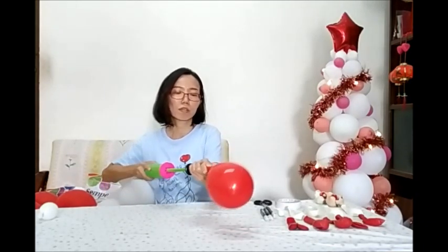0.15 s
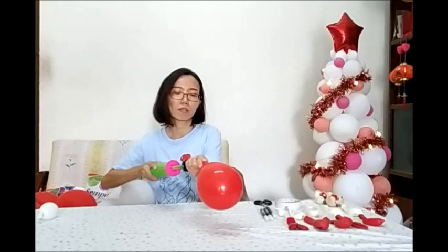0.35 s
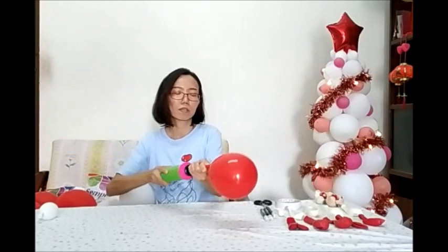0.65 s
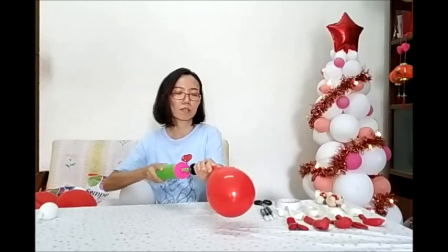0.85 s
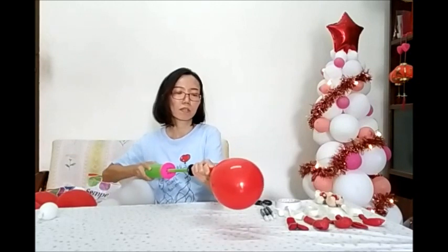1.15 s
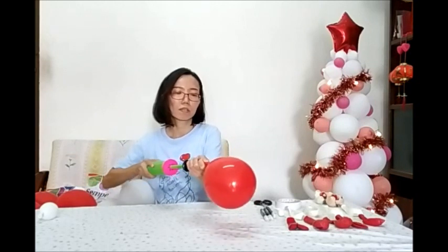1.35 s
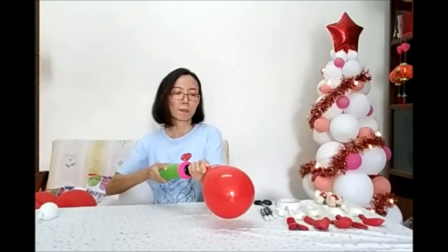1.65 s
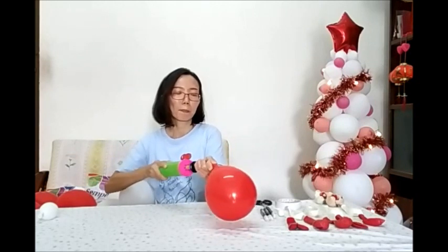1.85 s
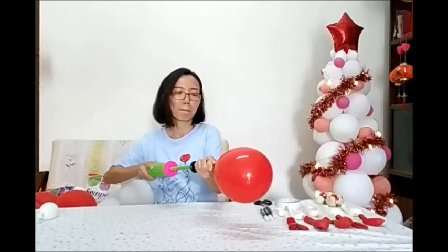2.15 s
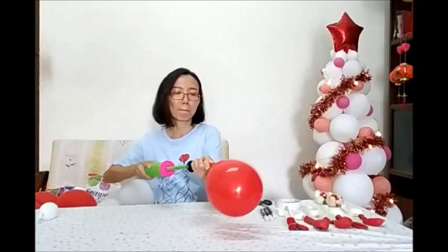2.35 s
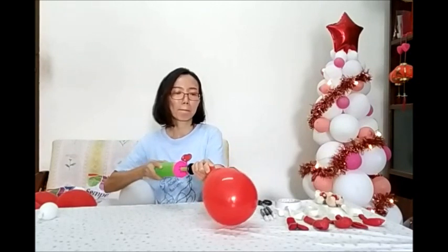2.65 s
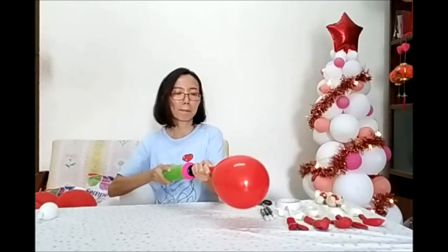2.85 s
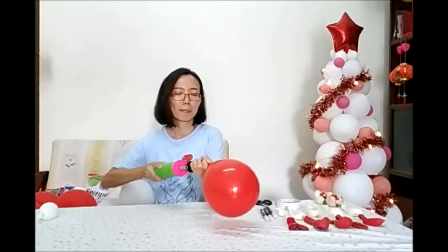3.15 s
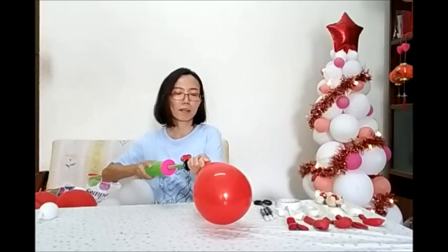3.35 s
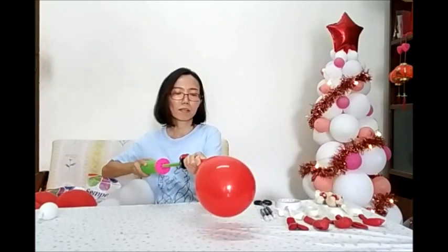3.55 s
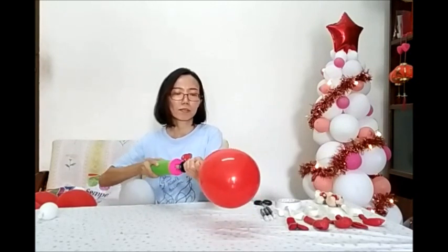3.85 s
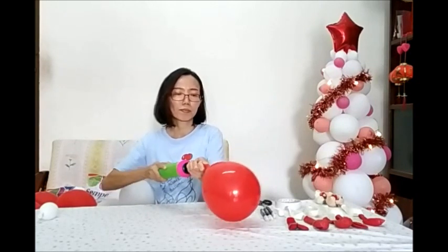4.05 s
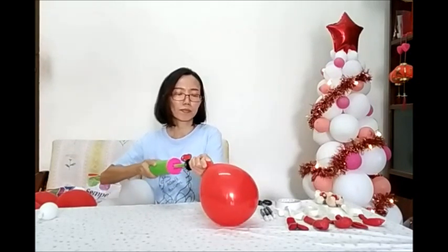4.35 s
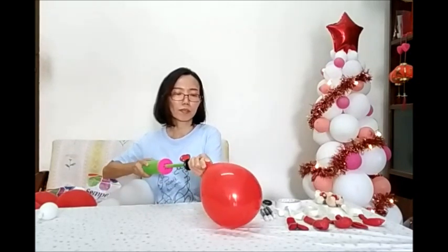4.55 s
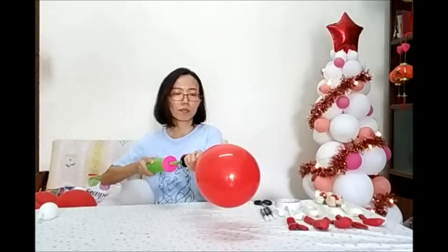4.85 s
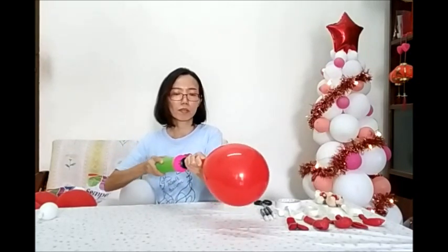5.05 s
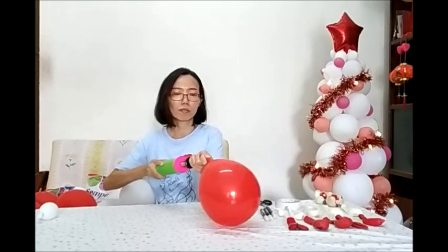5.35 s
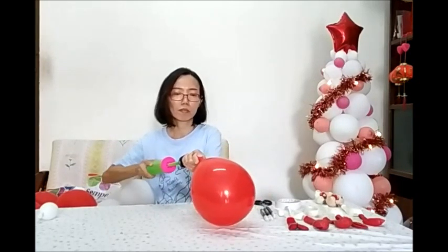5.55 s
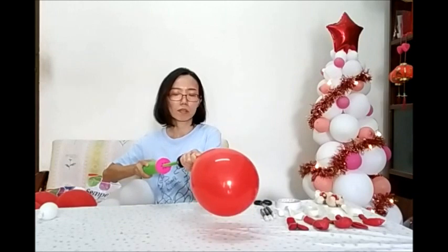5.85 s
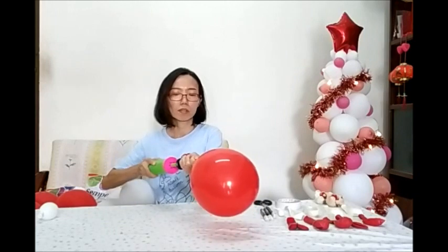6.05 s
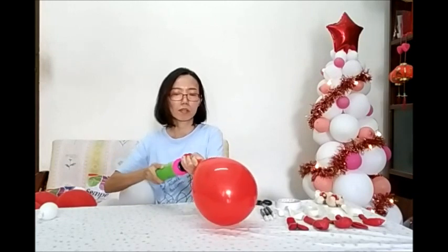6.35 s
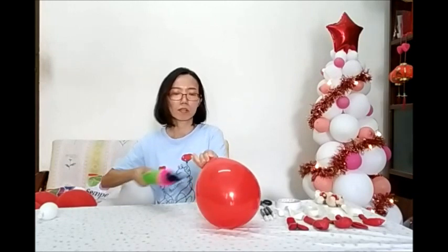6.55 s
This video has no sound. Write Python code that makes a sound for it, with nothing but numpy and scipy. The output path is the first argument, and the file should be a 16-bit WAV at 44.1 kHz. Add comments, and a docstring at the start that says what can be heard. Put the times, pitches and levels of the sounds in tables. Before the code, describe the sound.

Rhythmic bright air hisses from a double-acting balloon pump, with a snappy plastic clack after every push, in a small bare room.

```python
"""First comes a low, wavering room hum under the dying hiss of a pull on a double-acting plastic hand pump.
The pump goes on filling a balloon over a table in a small, bare room. The hiss is noise shaped by two valves.
A bright puff opens each push, and a knock of ringing barrel tones, a snap and a hollow tone end it.
Soft bumps of pump and balloon are low rings with a dull push; small plastic ticks are short bursts of noise."""
import sys
import numpy as np
from scipy import signal
from scipy.fft import rfft, irfft, next_fast_len
from scipy.io import wavfile
from scipy.ndimage import uniform_filter1d, map_coordinates

SR = 44100
rng = np.random.default_rng(int(sys.argv[2]) if len(sys.argv) > 2 else 0)


def master_out(mix):
    """Clip the mix to full scale and print it as 16-bit PCM to the path in sys.argv[1]."""
    frames = np.transpose(np.atleast_2d(mix))
    ceiling = np.clip(frames, -1, 1)
    pcm = np.round(ceiling * 32767).astype(np.int16)
    wavfile.write(sys.argv[1], SR, pcm)


N = 296114
TIME = np.arange(N) / SR  # s


def from_db(db):
    """Turn decibels into a gain."""
    return 10 ** (np.asarray(db) / 20)


def rms_one(x):
    """Scale a sound to rms 1."""
    return x / np.sqrt(np.mean(x ** 2) + 1e-20)


def at_hz(points, hz):
    """Read a table between its points, on a log-frequency axis."""
    points = np.array(points)
    return np.interp(np.log(np.maximum(hz, 1)), np.log(points[:, 0]), points[:, 1])


def colour(x, gain_at):
    """Filter by a gain that depends on frequency."""
    size = next_fast_len(x.shape[-1])
    hz = np.fft.rfftfreq(size, 1 / SR)
    return irfft(rfft(x, size) * gain_at(hz), size)[..., :x.shape[-1]]


def band(x, edges_hz, kind="band", order=2):
    """Keep one range of frequencies with a Butterworth filter."""
    edges_hz = np.clip(edges_hz, 10, .45 * SR)
    return signal.sosfilt(signal.butter(order, edges_hz, kind, fs=SR, output="sos"), x)


def drift(rate_hz):
    """Smooth random wandering with rms 1; a higher rate wanders faster."""
    return rms_one(colour(rng.standard_normal(N), lambda hz: 1 / (1 + (hz / rate_hz) ** 2)))


def noise(spectrum, width):
    """Stereo noise with a given spectrum and width, rms 1 in the middle."""
    mid, side = colour(rng.standard_normal((2, N)), lambda hz: from_db(at_hz(spectrum, hz)))
    side = colour(side, lambda hz: from_db(at_hz(width, hz)))
    return np.array([mid + side, mid - side]) / np.std(mid)


def burst(start, rise_s, t60):
    """An envelope that rises quickly and dies away; t60 is the time to fall by 60 dB, in s."""
    age = np.maximum(TIME - start, 0)
    return (1 - np.exp(-age / rise_s)) * from_db(-60 * np.minimum(age / t60, 4))


def hump(centre_s, half_s):
    """An envelope shaped like a rounded plateau of height 1."""
    return np.exp(-((TIME - centre_s) / half_s) ** 4)


# colour of the low room noise: (f/Hz, level/dB per Hz, relative)
FLOOR_SPECTRUM = [(20, 3.5), (35, 0), (55, -4), (95, -1.5), (135, -9), (200, 0), (270, -2.5), (400, -10.5),
                  (700, -10.5), (1200, -17.5), (2500, -25), (6000, -29), (16000, -38)]
# how wide the room noise sounds: (f/Hz, side level/dB relative to the middle)
FLOOR_WIDTH = [(30, -9), (120, -17), (300, -12.5), (700, -2.5), (2000, 1.5), (16000, 1)]
# steady hum tones: (f/Hz, rms level/dB)
HUM_TONES = [(92, -60), (178, -70.5), (201, -62.5), (445, -67.5), (534, -67)]


def background(floor_db=-50.5, waver_rad=0.58):
    """Low room noise plus steady tones whose phase wanders slowly, so the hum wavers."""
    hum = 0
    for hz, db in HUM_TONES:
        phase = 2 * np.pi * hz * TIME + waver_rad * drift(1.2)
        hum = hum + from_db(db) * np.sqrt(2) * np.sin(phase)  # sqrt(2) turns rms into peak
    return from_db(floor_db) * noise(FLOOR_SPECTRUM, FLOOR_WIDTH) + hum


# once the piston stops the hiss dies away, and a faint tail lingers
PUSH_RELEASE_S, PULL_RELEASE_S = 0.4, 0.32  # t60
LINGER_DB, LINGER_T60_S = -16.5, 0.81
# the hiss starts with slightly less edge, and dulls as it dies
OPENING_S, OPENING_EDGE_DB, OPENING_BODY_DB = 0.062, -1, 0
DULLING_S, DULLING_EDGE_DB, DULLING_BODY_DB = 0.15, -11.5, 2.5
ARCH_DB = 0.36  # the arm is fastest in the middle of a stroke


def stroke(row, release_s):
    """Power of hiss, edge and body: the flow rises, changes as the arm presses on, and dies after the stop."""
    start, stop, level_db, rise_s, swell_db, edge_db, body_db = row[:7]
    age = np.maximum(TIME - start, 0)
    since_stop = np.maximum(TIME - stop, 0)
    attack = np.sin(np.pi / 2 * np.minimum(age / rise_s, 1))
    travel = np.minimum(age / (stop - start), 1)  # 0 at the start, 1 at the stop
    hold = from_db(level_db + swell_db * (travel - 1) + ARCH_DB * np.sin(np.pi * travel))
    main_release = from_db(-60 * since_stop / release_s)
    lingering = from_db(LINGER_DB - 60 * since_stop / LINGER_T60_S)
    release = np.maximum(main_release, lingering)
    opening = np.exp(-age / OPENING_S)
    dulling = 1 - np.exp(-since_stop / DULLING_S)
    edge = from_db(edge_db + OPENING_EDGE_DB * opening + DULLING_EDGE_DB * dulling)
    body = from_db(body_db + OPENING_BODY_DB * opening + DULLING_BODY_DB * dulling)
    return (attack * hold * release * np.array([np.ones(N), edge, body])) ** 2


# Hiss means its middle part, about 6.5-11.8 kHz; body lies below that and edge above.
# Levels here are starting points for the shaping further on.
# the piston comes out: (start t/s, stop t/s, hiss level at the stop/dB, rise t/s, swell over the stroke/dB,
#   edge level/dB re hiss, body level/dB re hiss, widening/dB, leak level/dB)
PULLS = [(-0.299, 0.078, -31, 0.2, -8, -6, -4.5, 0.0, -48.0),
         (0.726, 1.11, -33, 0.25, -1.5, -10, -6.5, 8, -47),
         (1.769, 2.178, -27.5, 0.13, 12.5, -8, -6.5, 9.5, -54),
         (3.002, 3.431, -27.0, 0.36, 6.5, -9.5, -9.5, -1, -46.5),
         (4.133, 4.572, -29, 0.25, -0.5, -7, -12, 5, -47.5),
         (5.267, 5.703, -27.5, 0.37, -3.5, -8, -12.5, 3, -45.5)]
# the piston goes in: (start t/s, stop t/s, hiss level at the stop/dB, rise t/s, swell over the stroke/dB,
#   edge level/dB re hiss, body level/dB re hiss, widening/dB, spit level/dB, knock level/dB, clack f/Hz)
PUSHES = [(0.251, 0.5865, -30.0, 0.14, 2.5, -6, -8, 12.0, -36.5, -29.5, 2150.0),
          (1.281, 1.628, -32.5, 0.3, -3, -6, -6.5, 10, -37, -29.5, 2200.0),
          (2.439, 2.809, -29, 0.23, 5, -6, -10, 9, -43, -28.5, 2300.0),
          (3.612, 3.9542, -28, 0.31, 0.5, -5.5, -7, 13.5, -41, -26.5, 2300),
          (4.754, 5.1163, -29.5, 0.22, -3, -5, -7.5, 7.5, -40, -28.5, 2330),
          (5.875, 6.2288, -32, 0.28, -8.5, -2.5, -8, 6, -39, -32, 2570)]


def airflow(leak_edge_db=-14, leak_body_db=-11, rest_db=-68, leak_delay_s=0.12, leak_half_s=0.059):
    """Add the power of strokes and leaks: hiss in dB, and its edge and body in dB relative to it."""
    pushes = sum(stroke(row, PUSH_RELEASE_S) for row in PUSHES)
    pulls = sum(stroke(row, PULL_RELEASE_S) for row in PULLS)
    leak = from_db(rest_db)
    for _, stop, *_, db in PULLS:  # after a pull a little air leaks back
        leak = leak + from_db(db) * hump(stop + leak_delay_s, leak_half_s)
    # air seeps out once the pumping ends
    leak = leak + from_db(-52) * burst(6.39, rise_s=.015, t60=0.64)
    leak_power = np.outer(from_db([0, leak_edge_db, leak_body_db]), leak) ** 2
    air_db, edge_db, body_db = 10 * np.log10(pushes + pulls + leak_power)
    return air_db, edge_db - air_db, body_db - air_db


# faint whistles of the valve slots: (f/Hz, width f/Hz, lift level/dB)
WHISTLES = [(4140, 39, 7), (4570, 40, 4), (7660, 330, 1), (8400, 220, 1.5), (10040, 210, 2.5)]
# how wide the pump's noises start out: (f/Hz, side level/dB relative to the middle)
PUMP_WIDTH = [(200, -12), (600, -7), (1300, -1), (2500, -1.5), (4000, 3.5), (5000, -8.5), (7000, -2),
              (10000, -2), (12500, -3), (15000, 1)]


def valve(spectrum, edge_db, body_db, trim_db=-.1):
    """Jet noise with faint whistles; its edge and body follow the airflow separately."""
    def whistle_gain(hz):
        return from_db(sum(db / (1 + (2 * (hz - f) / w) ** 2) for f, w, db in WHISTLES))

    jet = colour(noise(spectrum, PUMP_WIDTH), whistle_gain)
    body = colour(jet, lambda hz: 1 / (1 + (hz / 6500) ** 14))
    edge = colour(jet, lambda hz: 1 - 1 / (1 + (hz / 11800) ** 30))
    middle = jet - body - edge
    out = 0
    for part, db in ((body, body_db), (middle, 0), (edge, edge_db)):
        out = out + part / np.std(part.mean(0)) * from_db(db + trim_db)
    return out


# hard surfaces near the pump: (echo delay t/ms, level/dB)
SURFACES = [(1.3, -24), (2.9, -7.5), (4.7, -6), (8.3, -6.5)]


def reflections(x, sway_ms):
    """Table and walls return the hiss a moment later; the ripples in its spectrum shift as the hands sway."""
    out, power = x, 1
    for delay_ms, db in SURFACES:
        source_at = np.arange(N) - (delay_ms + sway_ms * drift(.7)) * SR / 1000
        echo = np.array([map_coordinates(ear, [source_at], order=3) for ear in x])
        out = out + from_db(db) * echo
        power = power + from_db(db) ** 2
    return out / np.sqrt(power)


def flicker(x, depth_db=1.29, rate_hz=9):
    """Turbulence lets each narrow band of the jet swell and sink on its own."""
    edges = np.linspace(3500, 16000, 14)  # Hz
    out = x
    for low, high in zip(edges, edges[1:]):
        part = colour(x, lambda hz: (hz >= low) & (hz < high))
        out = out + part * (from_db(depth_db * drift(rate_hz)) - 1)
    return out * np.std(x) / np.std(out)


# each direction has its own valve: (f/Hz, level/dB per Hz, relative)
PULL_VALVE = [(1470, -23), (2500, -13.5), (3150, -11), (4000, -8), (4320, -9.5), (4670, -5.5), (5320, -5.5),
              (5660, -3), (8080, 2.5), (9790, 4.5), (12700, -4), (15100, -5), (15800, -12)]
PUSH_VALVE = [(1470, -32), (2500, -14), (3760, -8), (3910, -9), (5490, -2), (6610, 0.5), (9790, 3.5),
              (10400, 3), (13000, -11.5), (15100, -7.5), (15800, -12)]


def hiss(air_db, edge_db, body_db, flutter_db=0.15, grain_db=0.34, grain_hz=900, turn_s=0.048):
    """The two valves take turns; turbulence makes the jet flutter and sputter."""
    pull_starts = [row[0] for row in PULLS[1:]] + [np.inf]
    pushing = 0
    for row, pull_start in zip(PUSHES, pull_starts):  # each valve takes over turn_s before its stroke
        pushing = pushing + ((TIME > row[0] - turn_s) & (TIME < pull_start - turn_s))
    pushing = uniform_filter1d(pushing * 1., size=1300).clip(0, 1)  # crossfade, size in samples
    push = valve(PUSH_VALVE, edge_db, body_db)
    pull = valve(PULL_VALVE, edge_db, body_db)
    jet = np.sqrt(pushing) * push + np.sqrt(1 - pushing) * pull
    jet = flicker(reflections(jet, sway_ms=0.053))
    return jet * from_db(air_db + flutter_db * drift(21) + grain_db * drift(grain_hz))


# when the widening of a stroke applies: (centre s after the start, half length s)
PUSH_WIDE, PULL_WIDE = (0.038, 0.18), (.16, 0.15)


def widen(x, narrow_db=-10.5):
    """The sides change by each stroke's widening early on, then return to narrow_db."""
    side_db = narrow_db
    for rows, (centre_s, half_s) in ((PUSHES, PUSH_WIDE), (PULLS, PULL_WIDE)):
        side_db = side_db + sum(row[7] * hump(row[0] + centre_s, half_s) for row in rows)
    mid = x.mean(0)
    return mid + (x - mid) * from_db(side_db)


# the piston seal rubbing along the barrel: (f/Hz, level/dB per Hz, relative)
RUB_SPECTRUM = [(250, -4.5), (500, -4), (800, -1.5), (1150, -2.5), (1500, 0), (1820, 2), (2200, -0.5),
                (2800, -1.5), (4000, -13.5)]


def rub(air_db, level_db=-46, full_air_db=-27, growth=0.61, judder_db=0.5):
    """The seal's rubbing noise grows by 0.61 dB for each dB of airflow, and judders a little."""
    rub_db = level_db + growth * (air_db - full_air_db)
    return noise(RUB_SPECTRUM, PUMP_WIDTH) * from_db(rub_db + judder_db * drift(65))


# soft bumps of pump and balloon: (t/s, level/dB before its parts are weighted, pitch f/Hz, t60 t/s)
BUMPS = [(.09, -42.5, 219, .45), (.255, -40.5, 254, .33), (1.115, -42, 191, .35), (1.283, -43, 281, .3),
         (1.3, -45, 77, .9), (2.192, -43, 215, .42), (3.438, -47, 216, .5), (6.44, -48.5, 422, .34),
         (6.455, -37.5, 50, .5)]


def bumps(spread=1.5, thud_db=5, thud_hz=450, mode_db=-2, boom_db=-1.5):
    """A short dull push together with a low ring and a boom of noise around the same pitch."""
    out = 0
    for s, db, hz, t60 in BUMPS:
        boom = rms_one(band(rng.standard_normal(N), [hz / spread, hz * spread]))
        mode = np.sin(2 * np.pi * hz * (TIME - s))
        thud = band(burst(s, rise_s=0.064 / hz, t60=2 / hz), thud_hz, "low")
        tail = from_db(boom_db) * boom + from_db(mode_db) * mode
        tail = tail * burst(s, rise_s=0.0043, t60=t60)
        out = out + from_db(db) * (tail - from_db(thud_db) * thud)
    return out


# how long the room rings: (f/Hz, t60 t/s)
ROOM_DECAY = [(200, 0.16), (1000, 0.35), (2500, 0.46), (8000, 0.35), (16000, 0.5)]


def room(x, build_s):
    """Dense reflections, different at each ear, with a decay time set by frequency; unit power gain."""
    age = TIME[:SR * 3 // 4]
    edges = np.geomspace(100, 17000, 9)  # Hz
    tail = 0
    for low, high in zip(edges, edges[1:]):
        t60 = at_hz(ROOM_DECAY, np.sqrt(low * high))
        decay = np.exp(-np.log(1000) * age / t60)
        tail = tail + band(rng.standard_normal((2, len(age))), [low, high]) * decay
    tail = tail * (1 - np.exp(-age / build_s))
    tail = tail / np.sqrt(np.sum(tail ** 2) / 2)
    return signal.fftconvolve(np.atleast_2d(x), tail, axes=1)[:, :N]


# light plastic ticks as the grip changes: (t/s, level/dB before the burst shape)
TICKS = [(.197, -46), (3.541, -49), (6.402, -35)]
# colour of a tick: (f/Hz, level/dB per Hz, relative)
TICK_SPECTRUM = [(700, -10), (1400, 3), (3000, -24), (5000, 0), (10000, -2), (15000, -9)]


def ticks(t60=0.026, room_db=2):
    """Tiny dry clicks of noise with a short room tail."""
    envelope = sum(from_db(db) * burst(s, rise_s=.0005, t60=t60) for s, db in TICKS)
    clicks = noise(TICK_SPECTRUM, PUMP_WIDTH) * envelope
    return clicks + from_db(room_db) * room(clicks, build_s=0.0091)


# colour of the spit: (f/Hz, level/dB per Hz, relative)
SPIT_SPECTRUM = [(3000, -22), (6000, -18), (10000, -2), (12500, 3), (14500, 1), (16000, -15)]


def spits(rise_s=.011, t60=.35):
    """A short bright puff as the flap lifts at the start of each push."""
    envelope = sum(from_db(db) * burst(start, rise_s, t60) for start, *_, db, _, _ in PUSHES)
    return noise(SPIT_SPECTRUM, PUMP_WIDTH) * envelope


def stops():
    """Each push ends as the piston meets its stop: (t/s, knock level/dB, clack f/Hz)."""
    return [(stop, db, hz) for _, stop, *_, db, hz in PUSHES]


# ringing tones of the pump barrel: (f/Hz, level/dB re knock, t60 t/s)
BARREL = [(543, -11, 0.0098), (1060, -21, 0.0098), (1630, -22, 0.0036), (2120, -1.5, 0.0038),
          (2487, -4.5, 0.0067), (2920, -7.5, 0.0087), (3246, -4.5, 0.013)]


def knocks(direct_db=2.5, room_db=11, favour_db=7, favour_hz=300):
    """Each stop favours the barrel's ringing tones near its own pitch, and the room answers."""
    at, knock_db, pitch_hz = np.transpose(stops())
    out = 0
    for hz, db, t60 in BARREL:
        lift_db = favour_db / (1 + ((hz - pitch_hz) / favour_hz) ** 2)
        chance_db = rng.normal(0, 1, len(at))
        clicks = np.full(N, 1e-18)
        clicks[(at * SR).astype(int)] = from_db(knock_db + db + lift_db + chance_db)
        # a resonator rings as a decaying cosine after each click
        r = np.exp(-np.log(1000) / (t60 * SR))
        w = 2 * np.pi * hz / SR
        out = out + signal.lfilter([1, -r * np.cos(w)], [1, -2 * r * np.cos(w), r * r], clicks)
    out = band(out, 2830, "low", order=3)
    out = band(out, 350, "high")
    return from_db(direct_db) * out + from_db(room_db) * room(out, build_s=0.0037)


def hollow(hz=1125, level_db=-9.0, rise_s=0.02, t60=0.18):
    """The air in the barrel rings on for a moment after each knock."""
    out = 0
    for s, db, _ in stops():
        tone = np.sin(2 * np.pi * hz * (TIME - s))
        out = out + from_db(db + level_db) * burst(s, rise_s, t60) * tone
    return out


def cracks(level_db=18, rise_s=.0005, t60=.005):
    """Hard plastic on plastic: a bright snap of noise on top of each knock."""
    snap = rms_one(band(rng.standard_normal(N), [7000, 12000]))
    return snap * sum(from_db(db + level_db) * burst(s, rise_s, t60) for s, db, _ in stops())


# how the pump leans to one ear: (f/Hz, left minus right level/dB)
PUMP_BALANCE = [(1000, -0.5), (8000, -0.4), (10500, -0.7), (13000, 1.5), (16000, 0)]


def scene():
    """The pump near the middle, the room around it."""
    air_db, edge_db, body_db = airflow()
    air = widen(hiss(air_db, edge_db, body_db) + spits())
    pump = air + rub(air_db) + ticks() + knocks() + hollow() + cracks()
    half_each = np.array([[.5], [-.5]])  # left up, right down
    pump = colour(pump, lambda hz: from_db(at_hz(PUMP_BALANCE, hz) * half_each))
    return background() + pump + bumps()


def record(dry, cutoff_hz=15850):
    """A steep low-pass filter cuts off the very top."""
    return signal.sosfilt(signal.ellip(12, .1, 80, cutoff_hz, fs=SR, output="sos"), dry)


dry = scene()
out = record(dry)
master_out(out)
```